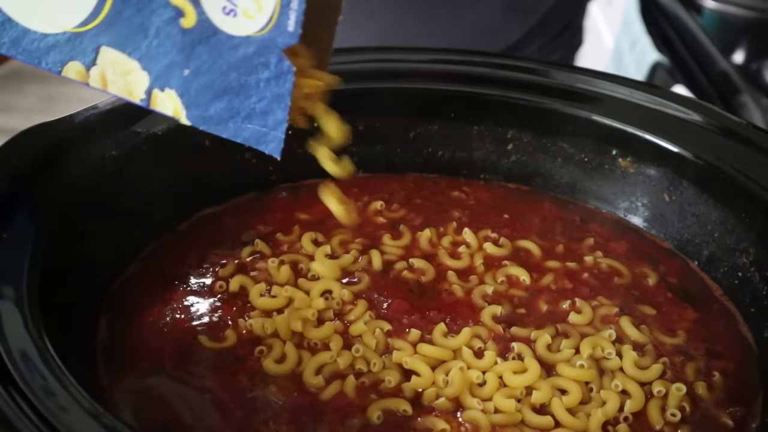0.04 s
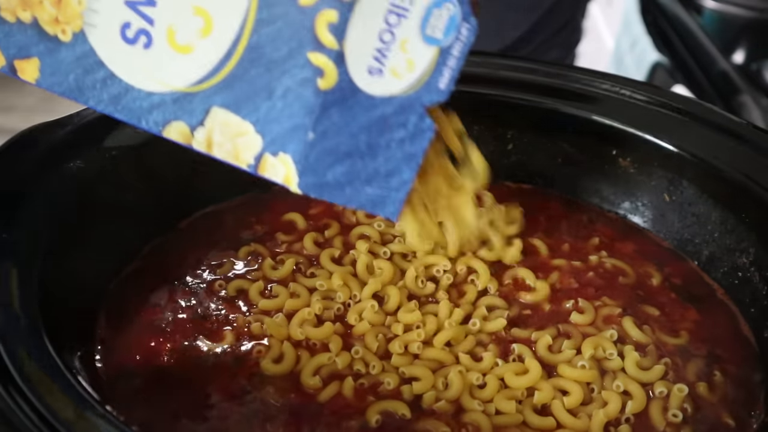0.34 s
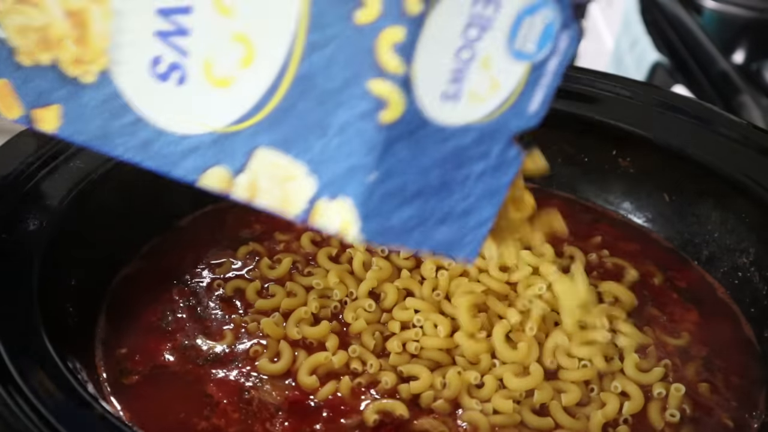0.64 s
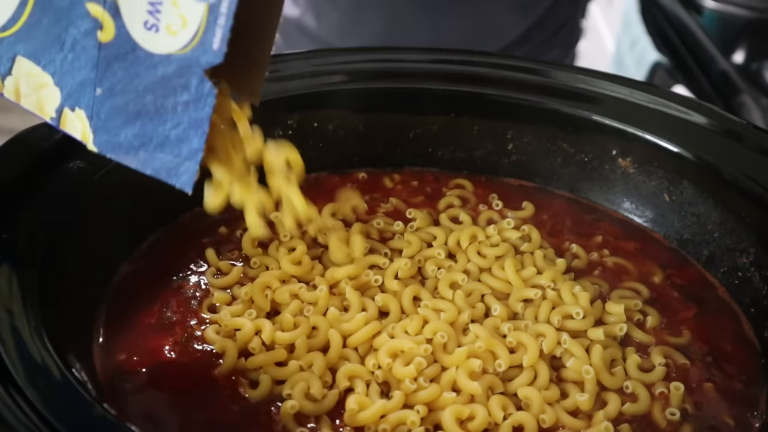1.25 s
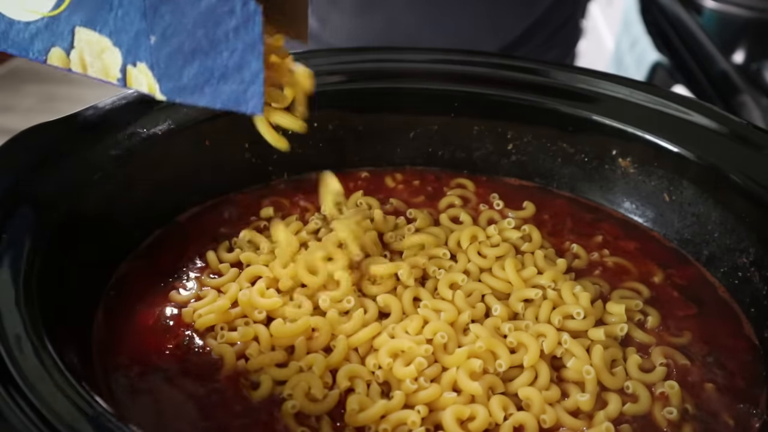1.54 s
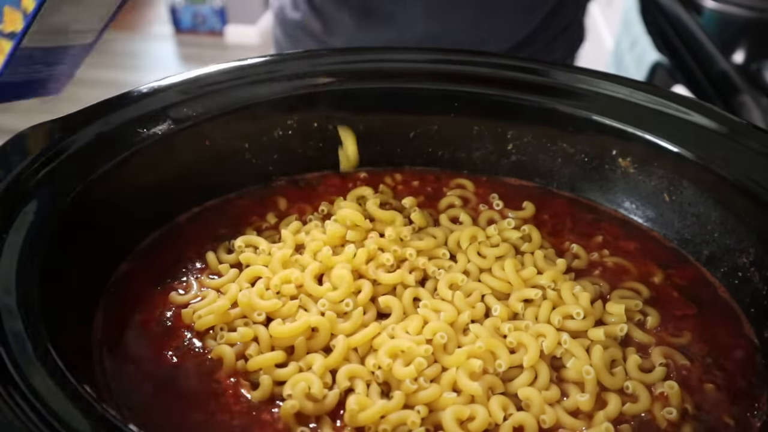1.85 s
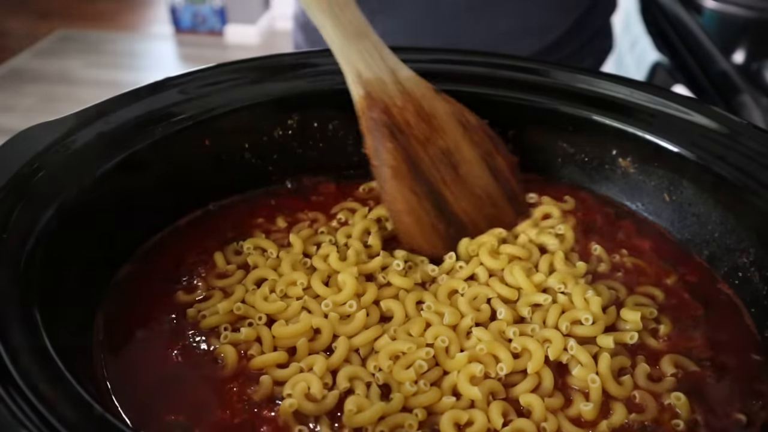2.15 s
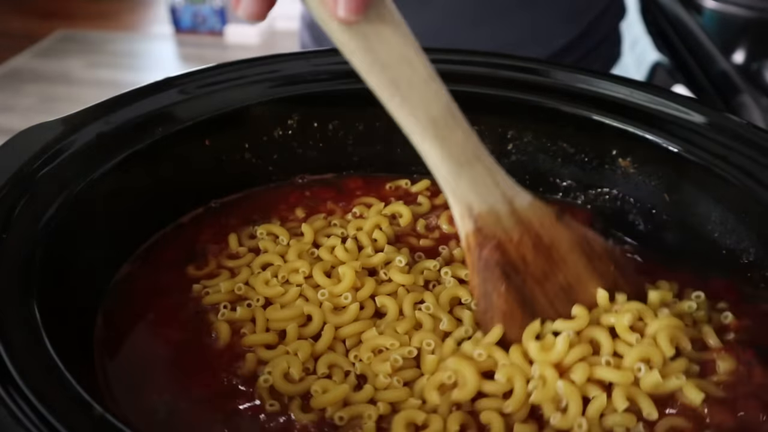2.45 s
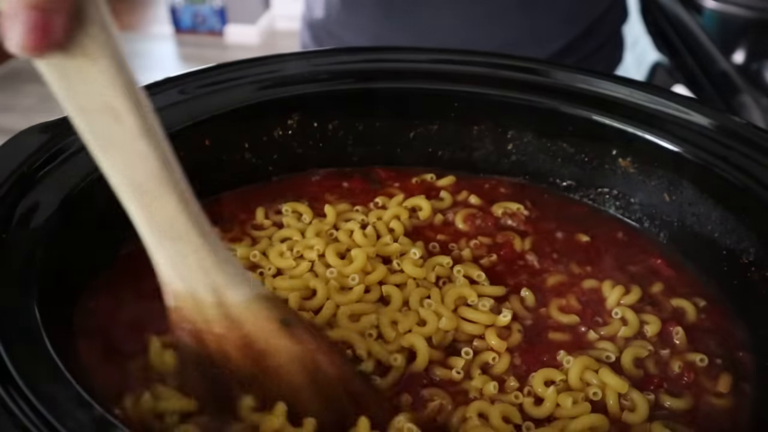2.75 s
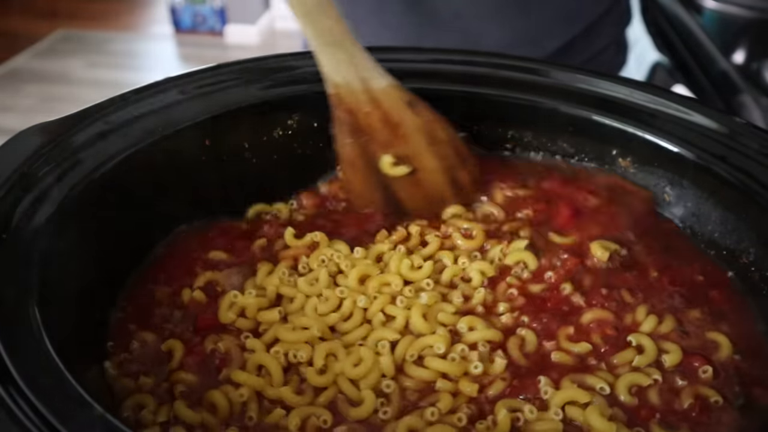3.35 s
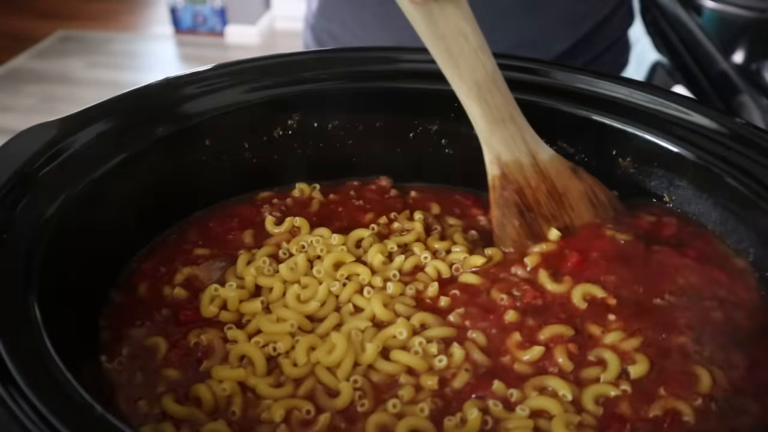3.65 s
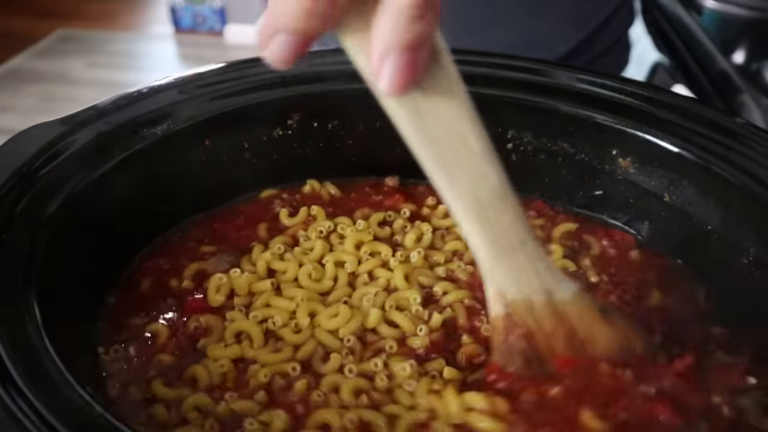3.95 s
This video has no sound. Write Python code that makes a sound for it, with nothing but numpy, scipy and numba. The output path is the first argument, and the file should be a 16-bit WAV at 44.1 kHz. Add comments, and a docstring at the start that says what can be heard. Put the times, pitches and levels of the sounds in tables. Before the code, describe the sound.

Dry pasta rattles from a box into a pot, then a spoon stirs it through sauce.

```python
"""Pasta poured into sauce, then stirred

Dry elbow pasta slides out of a cardboard box and patters onto a heap in a slow cooker full of sauce.
The last pieces tick down, the box rattles once more and the pour cuts off abruptly. A wooden spoon
then stirs: pieces crackle and click, the sauce squelches and pops. Swarms of tiny ringing collisions
make the textures, heard close and in stereo in a small kitchen with a low hum."""
import sys
import numpy as np
from scipy import signal
from scipy.fft import rfft, irfft, next_fast_len
from scipy.io import wavfile
from numba import njit

SR = 44100
rng = np.random.default_rng(int(sys.argv[2]) if len(sys.argv) > 2 else 0)


def unload_audio(sound):
    """Save the sound as a 16-bit wav file, at the path given as the first command line argument."""
    columns = np.transpose(np.atleast_2d(sound))
    # keep every value between -1 and 1, then stretch to whole-number steps
    steps = np.round(np.clip(columns, -1, 1) * 32767)
    wavfile.write(sys.argv[1], SR, steps.astype(np.int16))


N = 176400
TIME = np.arange(N) / SR
FFT_SIZE = next_fast_len(N + SR // 8, real=True)
FFT_HZ = np.fft.rfftfreq(FFT_SIZE, 1 / SR)
LEFT_RIGHT = np.array([[1], [-1]])


# Fader ride of the slide in the box. Each row: time in seconds, relative level in dB.
SLIDE = [(0.0, -28.5), (0.3, -22), (0.34, -28), (0.36, -22), (0.48, -26.5), (0.49, -22), (0.67, -27),
         (0.78, -21.5), (1.06, -23), (1.19, -32), (1.22, -28.5), (1.23, -35), (1.31, -25), (1.36, -30.5),
         (1.43, -29.5), (1.48, -23.5), (1.52, -33), (1.56, -28.5), (1.68, -30.5), (1.73, -41), (1.88, -34),
         (1.94, -24.5), (2.05, -26), (2.07, -24.5)]
# Clumps hitting the box wall. Each row: start in seconds, relative level in dB.
KNOCKS = [(0.049, -20.5), (0.289, -12), (0.307, -13.5), (0.508, -20), (1.2205, -14.5), (1.986, -14.5),
          (2.021, -19), (2.0345, -10.5), (2.039, -23)]
# Papery EQ of the cardboard. Each row: frequency in Hz, relative level in dB.
BOX_TONE = [(100, -44), (300, -23), (600, -8), (950, -11), (1500, -1.5), (2700, 0), (4000, -2), (6000, -10),
            (10000, -12.5), (16000, -30)]
# Resonances of the box. Each row: centre in Hz, width in Hz, lift in dB.
BOX_MODES = [(492, 260, 5.5), (656, 130, 7), (760, 67, 6), (1210, 176, 3.5), (1642, 150, 4.5),
             (1912, 42, 5), (2203, 81, 6), (2573, 89, 3.5), (3300, 100, 4)]
# The box's hollow note, one narrow peak. Each row: frequency in Hz, relative level in dB.
HOLLOW_TONE = [(100, -60.5), (900, -22), (1100, -9), (1180, 1), (1280, -5), (1450, -17.5), (16000, -64)]

def box():
    """Pasta tumbles along the cardboard and clumps knock on its wall; the emptying box turns hollow."""
    slide = contacts(rate=2000, scatter_db=3, t60=0.0087, top_hz=15720, modes=10)
    hits = slide * curve(SLIDE, column=1) * undb(1.5) + undb(19) * cracks(KNOCKS, t60=0.022)
    pair = in_kitchen(hits, pot_db=-3, room_db=-8, pan_db=-1)
    hollow_gain = undb(-16 + 4 * TIME)  # swells by 4 dB a second
    return colour(pair, BOX_TONE, BOX_MODES) + hollow_gain * colour(pair, HOLLOW_TONE)


# The falling stream. Each row: time in seconds, relative levels of clicks and of thuds in dB.
STREAM = [(0.0, -37, -39.5), (0.052, -31.5, -33), (0.172, -31, -33), (0.182, -41, -42.5), (0.22, -30, -21),
          (0.244, -32, -34), (0.292, -33, -22.5), (0.31, -20.5, -27), (0.33, -27, -33), (0.516, -26, -26),
          (0.684, -31, -36.5), (0.8, -33, -32), (1.106, -27, -34.5), (1.244, -34, -41.5),
          (1.326, -30.5, -36), (1.35, -42.5, -34), (1.436, -28, -34.5), (1.494, -33, -30.5),
          (1.528, -40.5, -41), (1.566, -24.5, -34.5), (1.704, -35.5, -49), (1.72, -39.5, -46.5)]
STREAM_END_S = 1.685  # only a trickle falls after this
# Single pieces landing hard. Each row: start in seconds, relative level in dB.
LANDINGS = [(0.206, -10), (0.301, -8), (0.308, -20), (0.317, -20), (0.358, -6), (0.402, -12), (0.427, -4),
            (0.456, -13), (1.561, -9), (1.577, -13), (1.602, -8), (1.649, -12.5), (1.677, -16),
            (1.708, -15.5), (1.734, -14), (1.740, -18.5), (1.763, -23), (1.768, -21), (1.774, -9),
            (1.779, -16), (1.785, -11), (1.8055, -13), (1.811, -12), (1.8153, -29), (1.8275, -8.5),
            (1.833, -13), (1.843, -7), (1.8483, -21), (1.8748, -9), (1.8835, -8), (1.895, -21.5),
            (2.002, -11)]
# Brittle EQ of pasta hitting pasta. Each row: frequency in Hz, relative level in dB.
HEAP_TONE = [(100, -28.5), (600, -17.5), (2000, -16), (5500, -7.5), (7000, 1.5), (9000, -5), (11300, 4.5),
             (13000, -1.5), (16000, -22.5)]
# Air resonances of the pot. Each row: centre in Hz, width in Hz, lift or cut in dB.
POT_MODES = [(189, 59, 5.5), (426, 130, 5.5), (540, 64, 7.5), (670, 168, 4.5), (795, 135, 3),
             (1238, 194, 6.5), (1710, 140, 5), (1900, 53, -4.5), (2070, 135, 5), (2650, 64, 1),
             (3040, 100, 4)]

def heap():
    """Falling pieces click on those already there; a thinner stream makes fewer clicks."""
    trickle = undb(-57)
    flow = np.where(TIME < STREAM_END_S, curve(STREAM, column=1), trickle)
    density = np.clip(flow / flow.max(), .25, 1)
    patter = contacts(rate=1300 * density, scatter_db=3, t60=0.0034, top_hz=15800, modes=8)
    patter = unit(patter / np.sqrt(density))  # evened out, so the flow alone sets the level
    clicks = patter * flow * undb(6) + undb(16) * cracks(LANDINGS, t60=.008)
    return colour(in_kitchen(clicks, pot_db=-5, room_db=-15, pan_db=-.8), HEAP_TONE, POT_MODES)


# Dull EQ of the heap's body. Each row: frequency in Hz, relative level in dB.
THUD_TONE = [(30, -28), (90, -14), (170, -6), (250, -11), (400, -1), (600, -4.5), (900, -4.5), (2000, -20),
             (16000, -63)]

def thuds():
    """The soft heap takes the stream with dull thuds that sound the pot."""
    fade = np.exp(-np.maximum(TIME - STREAM_END_S, 0) / 0.35)
    flow = curve(STREAM, column=2) * fade
    bumps = contacts(rate=350, scatter_db=0.5, t60=.014, top_hz=2110, modes=4) * flow * undb(-10.5)
    return colour(in_kitchen(bumps, pot_db=-5, room_db=-15, pan_db=-.5), THUD_TONE, POT_MODES)


# Fader rides of the stir. Each row: time in seconds, relative levels of crackle, squelch, sauce in dB.
STIR = [(2.09, -44.5, -44, -45), (2.26, -45, -40.5, -45), (2.402, -44, -42.5, -42),
        (2.53, -41.5, -39, -40.5), (2.636, -40, -39, -42), (2.716, -39, -36, -43.5),
        (2.85, -45, -37.5, -46.5), (3.042, -52, -44.5, -45.5), (3.27, -51.5, -48.5, -43),
        (3.356, -53, -45.5, -41.5), (3.494, -55, -54.5, -46), (3.732, -58.5, -59.5, -51.5),
        (4.0, -58, -55.5, -53)]
# Crisp EQ of the stirred pieces. Each row: frequency in Hz, relative level in dB.
CRACKLE_TONE = [(100, -37), (1500, -13), (4500, -5.5), (6500, 4.5), (9000, 0), (11300, 3.5), (13000, -5),
                (16000, -22)]

def crackle():
    """The spoon pushes dry pieces over each other; they click less often as they sink."""
    effort = curve(STIR, column=1)
    density = np.clip(effort / effort.max(), .15, 1)
    clicks = contacts(rate=1100 * density, scatter_db=4, t60=0.0022, top_hz=14900, modes=6)
    clicks = unit(clicks / np.sqrt(density)) * effort * undb(6.5)
    return colour(in_kitchen(clicks, pot_db=-4.5, room_db=-17, pan_db=0), CRACKLE_TONE)


# Accents off the spoon. Each row: start in seconds, relative level in dB, band centre in Hz.
SNAPS = [(2.1416, -15.5, 4000), (2.175, -16.5, 2620), (2.222, -23, 1800), (2.2533, -12.5, 4200),
         (2.261, -19.5, 4200), (2.277, -15, 3200), (2.269, -15, 3100), (2.283, -20, 2600),
         (2.300, -15.5, 4200), (2.327, -18, 7000), (2.360, -35, 4500), (2.4103, -5.5, 3070),
         (2.514, -19, 4100), (2.521, -4, 5000), (2.5305, -20, 6000), (2.541, -13, 5000), (2.568, -18, 3000),
         (2.608, -11, 5000), (2.619, -9.5, 4800), (2.627, -12, 6500), (2.697, -11, 5030),
         (2.743, -16, 3000), (2.829, -19, 2400), (2.909, -10.5, 3000), (2.919, -24, 3470),
         (2.961, -21, 4940), (2.983, -18, 3970), (2.991, -16, 3940), (3.108, -24.5, 9000),
         (3.1562, -24, 7000), (3.319, -17.5, 4020), (3.380, -17, 11000), (3.4012, -14.5, 2040),
         (3.4013, -10, 9500), (3.419, -15, 3000), (3.455, -16.5, 4940), (3.5536, -25, 2590),
         (3.5808, -25.5, 8600), (3.675, -25, 7000), (3.772, -29, 1400), (3.820, -27.5, 10000),
         (3.8615, -28, 6500), (3.965, -20, 2220), (3.980, -26, 4500)]
# Bright EQ of the snaps. Each row: frequency in Hz, relative level in dB.
SNAP_TONE = [(100, -56), (600, 2), (2000, -0.5), (5000, 4), (9000, 5.5), (11300, 8.5), (13000, 0),
             (16000, -10)]

def snaps():
    """Single pieces catch on the spoon and snap free, each around its own pitch."""
    out = np.zeros(N)
    for start, db, hz in SNAPS:
        band = signal.butter(2, [hz / 1.9, min(hz * 1.9, .45 * SR)], "bandpass", fs=SR, output="sos")
        click = signal.sosfilt(band, burst(t60=.006))
        add(out, start, undb(db + 10.5) * click / np.sqrt(np.sum(click ** 2)))
    return colour(in_kitchen(out, pot_db=-6, room_db=-16, pan_db=-2), SNAP_TONE, POT_MODES)


# Wet upper-mid EQ of the squelch. Each row: frequency in Hz, relative level in dB.
SQUELCH_TONE = [(100, -37), (800, -13.5), (1300, -5), (2000, 2), (3000, 0.5), (4600, 5), (6500, -14),
                (16000, -22)]

def squelch():
    """Wet pieces stick and part in a fizz of tiny bubbles."""
    fizz = contacts(rate=900, scatter_db=6, t60=0.0082, top_hz=6980, modes=1)
    fizz *= curve(STIR, column=2) * undb(-.5)
    return colour(in_kitchen(fizz, pot_db=-4, room_db=-1, pan_db=-3.5), SQUELCH_TONE, POT_MODES)


# Thick midrange EQ of the sauce. Each row: frequency in Hz, relative level in dB.
SAUCE_TONE = [(50, -20), (250, -20), (420, -11), (620, 0), (900, -8.5), (1250, -3), (2000, -13),
              (4000, -14), (16000, -45)]

def sauce():
    """The spoon's blade churns the thick sauce below."""
    churn = contacts(rate=500, scatter_db=3.5, t60=0.013, top_hz=3014, modes=3)
    churn *= curve(STIR, column=3) * undb(-8.5)
    return colour(in_kitchen(churn, pot_db=3, room_db=-22, pan_db=-3), SAUCE_TONE, POT_MODES)


# Pops in the sauce. Each row: start in seconds, relative level in dB, starting pitch in Hz.
POPS = [(2.311, -23.5, 3230), (2.903, -19, 2850), (3.012, -28, 4240), (3.085, -30, 1490),
        (3.251, -31, 2200), (3.482, -32, 4650), (3.674, -35, 4780), (3.7008, -31.5, 1510)]

def pops():
    """Small air pockets ring briefly with a rising pitch."""
    rise_per_s, t60 = 6.4, 0.02
    out, t = np.zeros(N), np.arange(SR // 20) / SR
    for start, db, hz in POPS:
        chirp = np.sin(2 * np.pi * hz * t * (1 + rise_per_s * t / 2))
        add(out, start, undb(db + 4) * chirp * decay(t, t60))
    return in_kitchen(out, pot_db=-19, room_db=-16, pan_db=-3.5)


# Bass-heavy EQ of the room tone. Each row: frequency in Hz, relative level in dB.
HUM_TONE = [(20, -9.5), (40, -3), (58, 0), (75, -7.5), (120, -5.5), (175, -4), (260, -16.5), (550, -13),
            (1000, -23), (3000, -44), (16000, -51.5)]

def hum():
    """Low steady rumble of the kitchen with a little hiss."""
    noise = irfft(diffuse(rng.standard_normal((2, N)), wide_hz=930), FFT_SIZE)[:, :N]
    return unit(colour(noise, HUM_TONE))


# Stereo placement of the direct sound. Each row: frequency in Hz, phase lead of the left in radians.
LEFT_LEAD = [(20, 1), (600, 0.18), (1300, 1.03), (2200, 1.34), (3000, 1.77), (6000, 1.79), (7500, 4),
             (16000, 3.5)]

def in_kitchen(x, pot_db, room_db, pan_db):
    """Direct sound in stereo plus its echoes; a negative pan leans right."""
    direct = rfft(x, FFT_SIZE) * np.exp(.5j * LEFT_RIGHT * over_hz(LEFT_LEAD, FFT_HZ))
    reflected = diffuse(echoes(x, pot_db, room_db), wide_hz=1300)
    pair = irfft(direct + reflected, FFT_SIZE)[:, :N]
    total_power = 1 + undb(pot_db) ** 2 + undb(room_db) ** 2
    return pair / np.sqrt(total_power) * undb(LEFT_RIGHT * pan_db / 2)


def echoes(x, pot_db, room_db, pot_t60=.032, room_t60=.28):
    """Every contact happens somewhere else, so its echoes are fresh, dying noise of its colour."""
    size = 128
    power = abs(signal.stft(x, nperseg=size)[2]) ** 2
    tail = 0
    for db, t60 in ((pot_db, pot_t60), (room_db, room_t60)):
        feedback = decay(size / SR, t60)
        tail = tail + undb(db) ** 2 * signal.lfilter([0, 1 - feedback], [1, -feedback], power + 1e-18)
    noise = signal.stft(rng.standard_normal((2, N)), nperseg=size)[2]
    return signal.istft(noise / np.std(noise) * np.sqrt(tail), nperseg=size)[1][:, :N]


def diffuse(pair, wide_hz):
    """Left and right spectra of a diffuse field: alike in the bass, unrelated well above wide_hz."""
    mid, side = rfft(pair, FFT_SIZE)
    alike = 1 / (1 + (FFT_HZ / wide_hz) ** 2)
    return (mid * np.sqrt(1 + alike) + LEFT_RIGHT * side * np.sqrt(1 - alike)) / np.sqrt(2)


def contacts(rate, scatter_db, t60, top_hz, modes):
    """Random collisions, `rate` a second, each with its own strength and briefly ringing modes."""
    most = 8000
    due = np.cumsum(rng.exponential(size=most))
    strength = np.clip(rng.standard_normal(most), -2, 2)
    start = np.searchsorted(np.cumsum(np.ones(N) * rate / SR), due)
    pitch, length, phase = rng.random((3, most * modes))
    gain = np.repeat(undb(scatter_db * strength), modes)
    return unit(ring(np.repeat(start, modes), gain, pitch * top_hz, t60 * (.5 + length), 2 * np.pi * phase))


@njit
def ring(start, gain, hz, t60, phase):
    """Sum of damped sines, each from its own start sample."""
    out = np.zeros(N)
    for k in range(len(start)):
        phasor = gain[k] * np.exp(1j * phase[k])
        step = np.exp(2j * np.pi * hz[k] / SR - np.log(1000) / (t60[k] * SR))
        for i in range(start[k], min(N, start[k] + int(t60[k] * SR))):
            out[i] += phasor.imag
            phasor *= step
    return out


def cracks(rows, t60):
    """A short crack of noise for every row."""
    out = np.zeros(N)
    for start, db in rows:
        add(out, start, undb(db) * burst(t60))
    return out


def burst(t60):
    """Decaying noise of unit energy."""
    t = np.arange(SR // 16) / SR
    noise = rng.standard_normal(len(t)) * decay(t, t60)
    return noise / np.sqrt(np.sum(noise ** 2))


def colour(x, tone, modes=()):
    """EQ of unit power: a smooth spectrum with resonances on top."""
    size = 8192
    f = np.arange(size // 2 + 1) * SR / size
    peaks_db = sum(lift / (1 + (2 * (f - hz) / width) ** 2) for hz, width, lift in modes)
    cepstrum = irfft(np.log(unit(undb(over_hz(tone, f) + peaks_db))))
    cepstrum[1:size // 2] *= 2  # minimum phase: nothing rings ahead of a hit
    cepstrum[size // 2 + 1:] = 0
    impulse = irfft(np.exp(rfft(cepstrum)))
    return irfft(rfft(x, FFT_SIZE) * rfft(impulse, FFT_SIZE), FFT_SIZE)[..., :N]


def curve(table, column):
    """One dB column of a time table as a gain per sample."""
    rows = np.array(table)
    return undb(np.interp(TIME, rows[:, 0], rows[:, column]))


def over_hz(points, f):
    """Join points on a log-frequency axis."""
    rows = np.array(points)
    return np.interp(np.log(f + 1), np.log(rows[:, 0]), rows[:, 1])


def add(out, start_s, x):
    """Mix a short sound in at a time."""
    i = int(start_s * SR)
    out[i:i + len(x)] += x[:N - i]


def decay(t, t60):
    """Fall by 60 dB every t60 seconds."""
    return np.exp(-np.log(1000) * t / t60)


def undb(db):
    return 10 ** (np.asarray(db) / 20)


def unit(x):
    """Scale to rms 1."""
    return x / np.sqrt(np.mean(x ** 2))


def scene():
    """The pour, then a hard cut to the stir, where the hum sits a little louder."""
    cut_s, crossfade_s = 2.074, 0.0015
    stirring = np.clip((TIME - cut_s) / crossfade_s + .5, 0, 1)
    room = hum()
    pour = box() + heap() + thuds() + undb(-50.5) * room
    stir = crackle() + squelch() + sauce() + snaps() + pops() + undb(-46) * room
    return (1 - stirring) * pour + stirring * stir


def record(dry):
    """Flatten peaks at full scale, then cut the top treble steeply."""
    lowpass = signal.ellip(13, .2, 100, 15850, fs=SR, output="sos")
    return signal.sosfilt(lowpass, np.clip(dry, -1, 1))


dry = scene()
out = record(dry)
unload_audio(out)
```